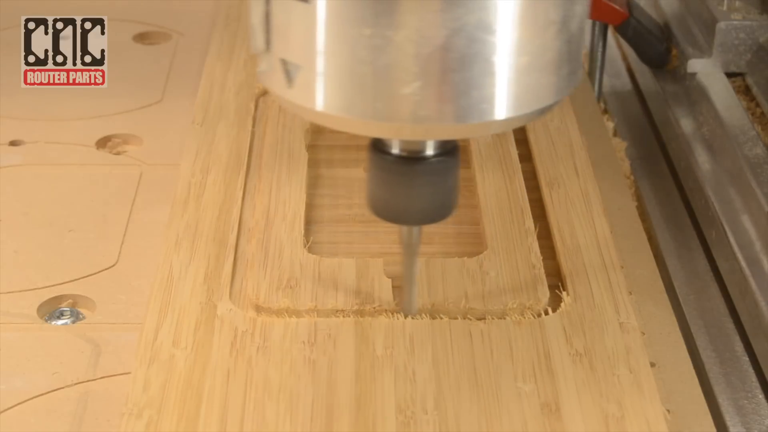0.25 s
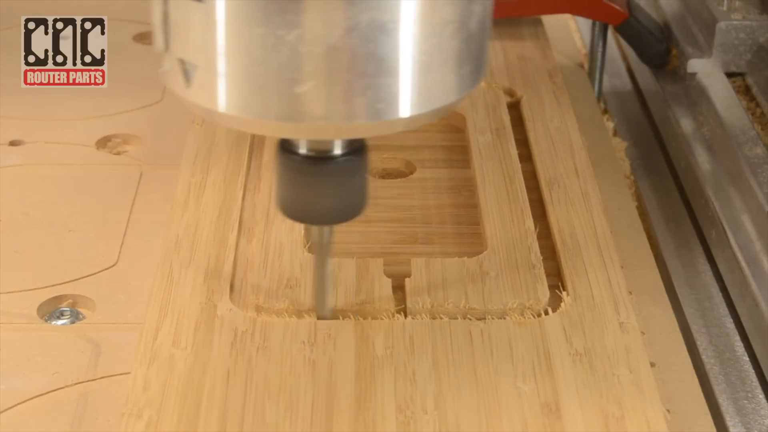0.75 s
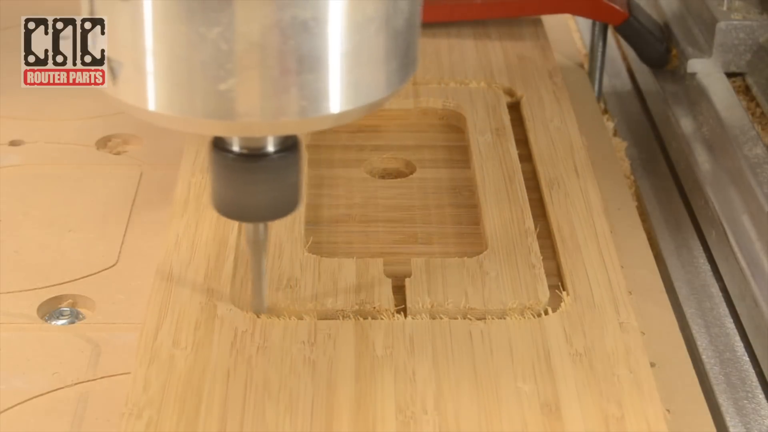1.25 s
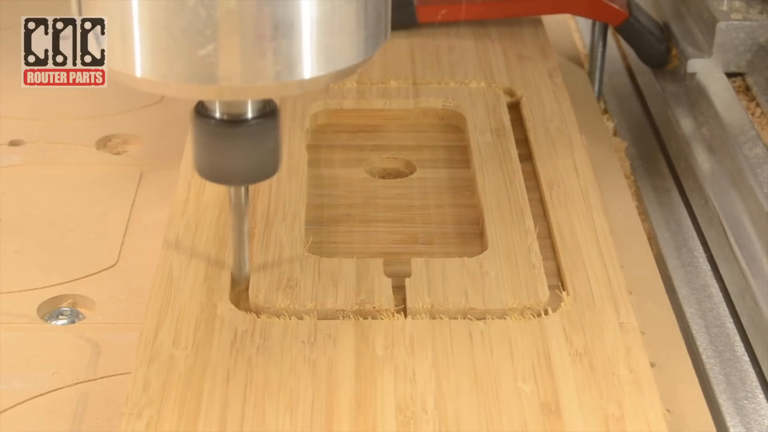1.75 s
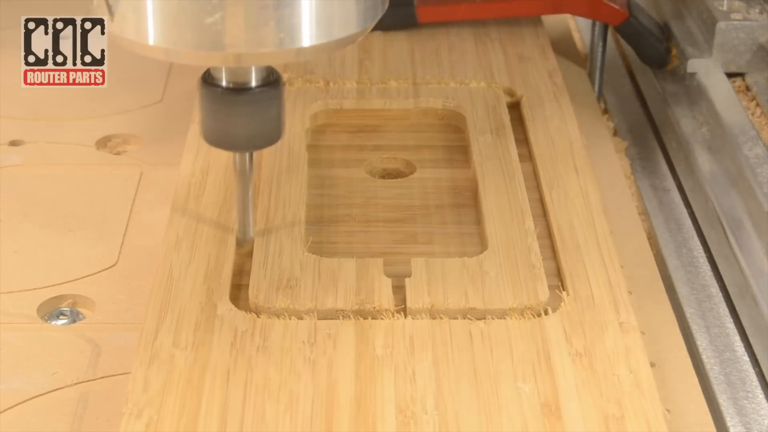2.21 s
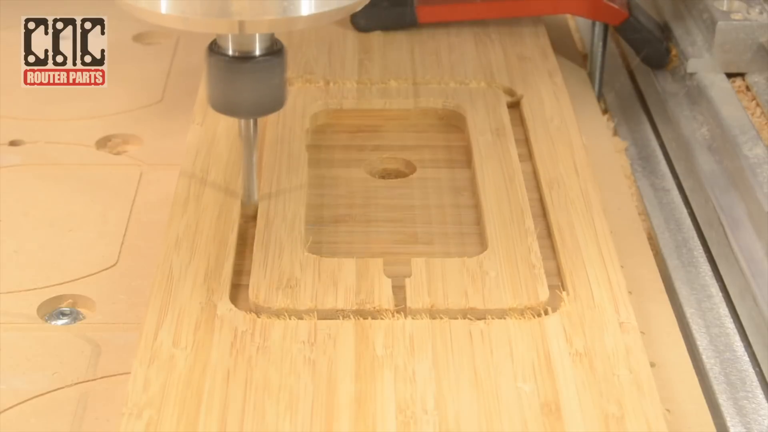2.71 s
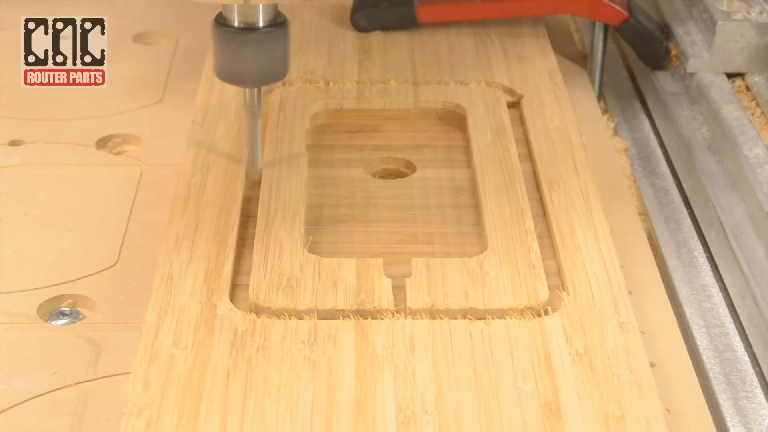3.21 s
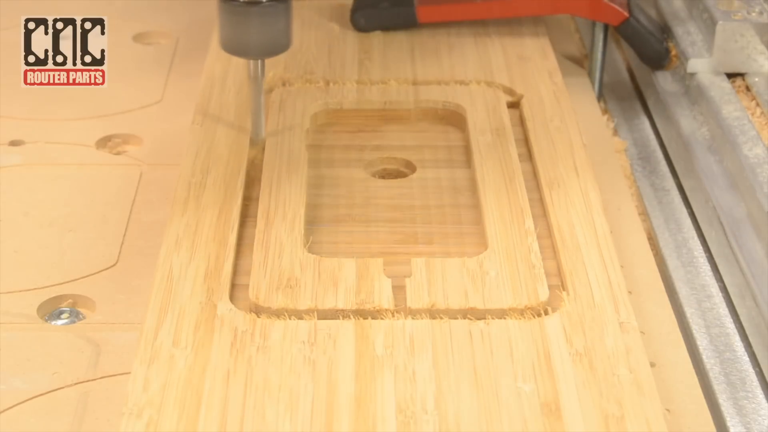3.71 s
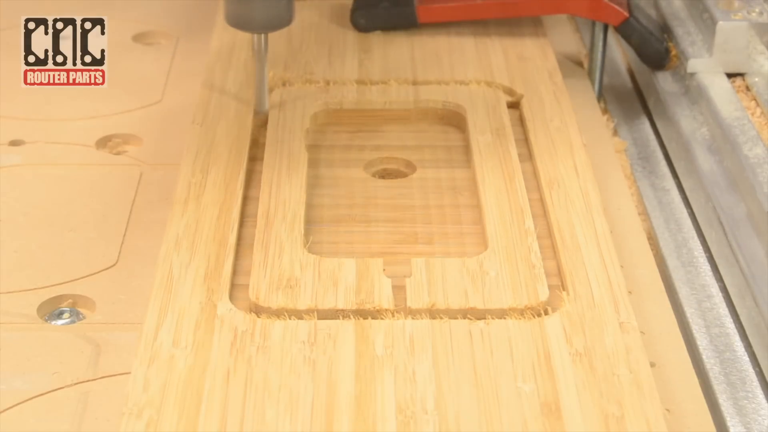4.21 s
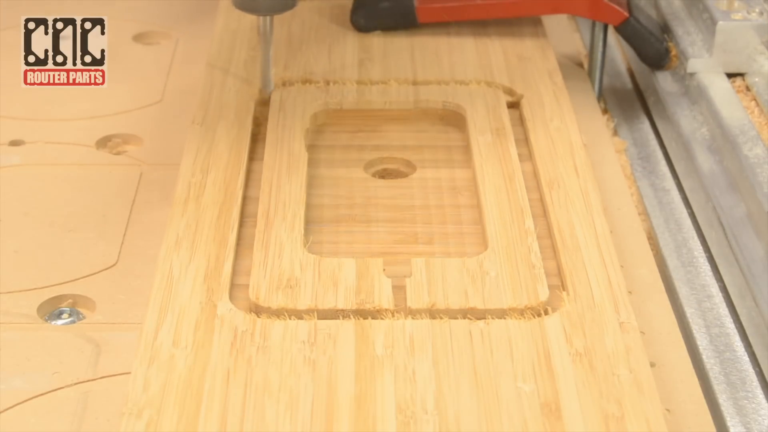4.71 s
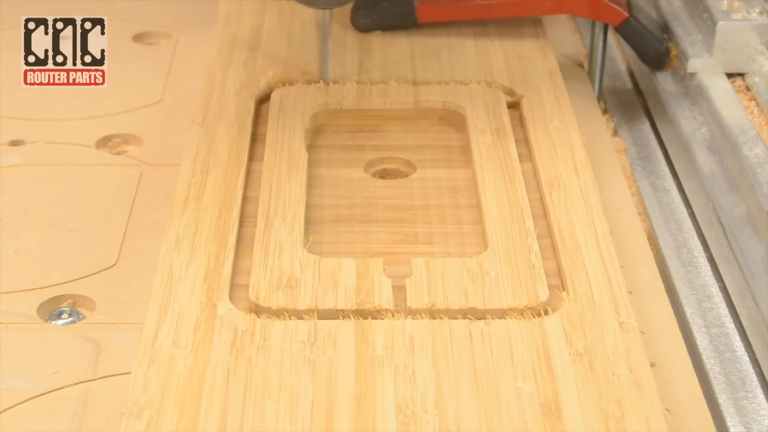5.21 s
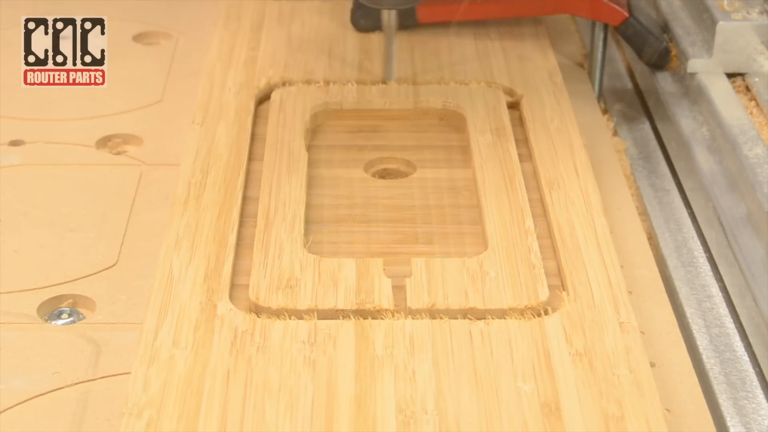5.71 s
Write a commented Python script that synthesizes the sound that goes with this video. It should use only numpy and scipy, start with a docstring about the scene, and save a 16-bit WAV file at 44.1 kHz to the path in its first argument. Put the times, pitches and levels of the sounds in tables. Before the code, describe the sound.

A machine router mills a groove in a wooden board, its spindle giving a steady high whine over an even hiss of air and chips. The cutter squeals in short, shrill, fluttering bursts, loudest and most crowded about a second in. After that the squeals are weaker and more scattered while the whine and hiss carry on. The microphone is close, in a workshop.

```python
"""Bursts of shrill squeal over a steady whine and hiss: a router near 25000 rpm mills a groove in hard board.
The squeal is the long cutter chattering near its bending mode, with sidebands one shaft order apart.
Unbalance, cutting force and a fan sound the shaft orders; a bearing whines between them.
Chips and cooling air hiss, the board drones, machinery hums far off. A small mono microphone stands close."""
import sys
import numpy as np
from scipy import signal
from scipy.fft import rfft, irfft, next_fast_len
from scipy.io import wavfile
from scipy.ndimage import uniform_filter1d, minimum_filter1d, map_coordinates

SR = 44100
rng = np.random.default_rng(int(sys.argv[2]) if len(sys.argv) > 2 else 0)


def master_out(mix):
    """Clip the mix to full scale and print it as 16-bit PCM to the path in sys.argv[1]."""
    frames = np.transpose(np.atleast_2d(mix))
    ceiling = np.clip(frames, -1, 1)
    pcm = np.round(ceiling * 32767).astype(np.int16)
    wavfile.write(sys.argv[1], SR, pcm)


N = 262395

# Chatter bursts. Each row: start of hold in seconds, hold in seconds, decay in dB per second,
# pitch in Hz, then main line, lower sideband and upper sideband in dB.
BURSTS = [(0, 0.11, 100, 2386, -54, -60, -53.5), (0.18, 0.012, 82, 2390, -47.5, -55, -51),
          (.375, 0.046, 72, 2386, -44, -57, -57), (0.483, 0.011, 54, 2380, -41.5, -65, -56),
          (0.702, .035, 100, 2388, -42, -62, -57), (0.754, 0.041, 60, 2377, -36, -57, -50),
          (0.842, 0.047, 150, 2379, -37, -60, -54), (0.91, 0.025, 63, 2377, -37.5, -54, -47),
          (0.975, 0.038, 137, 2386, -35.5, -57, -57), (1.144, 0.052, 60.5, 2386, -39, -62, -53),
          (1.223, 0.11, 350, 2389, -36, -61, -52), (1.38, 0.027, 110, 2390, -42.5, -57, -61),
          (1.57, 0.012, 300, 2405, -52, -54, -50.5), (1.863, 0.023, 95.5, 2410, -47.5, -53, -53),
          (1.98, 0.031, 304, 2400, -50, -59, -59), (2.264, .02, 149, 2420, -47, -64, -55.5),
          (2.52, .03, 100, 2395, -51.5, -56, -56), (2.578, 0.018, 218, 2400, -43.5, -64, -53),
          (2.669, .04, 400, 2410, -40, -52, -48), (2.855, .03, 91, 2408, -47, -57, -59),
          (3.173, .01, 150, 2404, -49.5, -56.5, -59), (3.587, .02, 63, 2375, -54.5, -63, -63),
          (3.74, .03, 113, 2390, -46.5, -53, -56.5), (4.488, .03, 151, 2385, -51, -51, -57),
          (4.525, .04, 399, 2392, -45.5, -48, -70), (4.619, 0.033, 82, 2387, -51, -50, -71),
          (4.699, 0.027, 122, 2397, -52.5, -57, -56), (4.957, .03, 104, 2370, -49, -62, -51),
          (5.03, .02, 300, 2372, -49.5, -60, -51), (5.106, 0.072, 300, 2368, -45.5, -53, -47.5),
          (5.27, 0.064, 150, 2372, -49.5, -58, -50), (5.367, .04, 150, 2370, -49.5, -57.5, -51),
          (5.59, 0.036, 150, 2383, -53, -56, -50)]
# Ringing between bursts. Each row: start in seconds, then main line, lower and upper sideband in dB.
IDLE_RING = [(0, -55, -62, -64), (1.45, -61, -64, -66), (2.3, -59, -70, -64), (3.8, -58, -62, -63),
             (4.75, -62, -64, -62), (5.45, -67, -70, -61.5)]
# Far chatter sidebands. Each row: offset in shaft orders, base level in dB re the first upper sideband.
FAR_SIDEBANDS = [(-3, -18), (-2, -16), (2, -13), (3, -13), (4, -18)]
# The edge leaves the wood at a slot and a corner. Each row: time, climb and settle in seconds,
# pitch rise in Hz, far sideband flare in dB before its cap.
RELEASES = [(1.106, 0.0354, 0.02734, 124.6, 19), (4.58, 0.0561, 0.0584, 94.6, 2)]
# Tool path legs, across and along the grain. Each row: start in seconds, roughness of weak chatter 0-1,
# far sideband gain in dB, then shaft orders 12, 3, 4, 5 and 6 in dB.
PATH_LEGS = [(0, 0.04, 1.5, -65, -59.5, -67, -56.5, -68), (1.38, .25, 2, -67, -62.5, -59, -59.5, -54),
             (2.25, 0.35, 3.5, -70, -57, -57.5, -61, -53), (3.3, 0.27, 5, -69, -59.5, -63.5, -62, -53.5),
             (3.85, 0.21, 1, -68, -55, -60.5, -58.5, -55.5), (4.5, .2, 4, -64, -59.5, -56.5, -59.5, -57),
             (4.93, 0.25, -3.5, -63, -67.5, -66, -63, -55.5), (5.35, 0.23, -2.5, -66, -73, -66, -58, -60.5)]
# Shaft speed, sagging under load. Each row: time in seconds, speed in Hz.
SHAFT_SPEED = [(0.0, 419.05), (0.45, 418.56), (0.97, 416.11), (1.18, 419.13), (1.53, 419.44),
               (1.87, 418.31), (2.43, 417.29), (2.73, 415.98), (2.97, 416.5), (3.46, 416.5), (3.7, 415.52),
               (3.9, 415.69), (4.17, 414.26), (4.33, 414.52), (4.52, 416.15), (4.67, 418.59),
               (5.05, 417.52), (5.95, 416.1)]
# Shaft hum. Each row: time in seconds, orders 1 and 2 in dB.
UNBALANCE = [(0, -58, -59.5), (.45, -56, -63), (.7, -54.5, -62.5), (.97, -51.5, -60.5), (1.1, -60, -67),
             (1.2, -56, -57.5), (1.65, -63, -61), (2.21, -60.5, -62), (2.43, -58.5, -62.5),
             (2.97, -57, -59.5), (3.29, -55, -61), (3.37, -58, -60), (3.65, -54, -62), (3.8, -58.5, -61.5),
             (4.04, -53.5, -62), (4.28, -60, -65.5), (4.52, -60.5, -63), (4.67, -58, -70),
             (4.8, -55.5, -62.5), (5, -58, -59.5), (5.95, -60.5, -58)]
# Cooling fan tone. Each row: time in seconds, level in dB.
FAN_TONE = [(0, -58.5), (.7, -54), (.97, -70), (1.15, -66), (1.65, -58.5), (1.85, -60), (2.25, -67),
            (2.65, -60), (2.82, -69), (2.97, -58), (3.46, -61), (3.65, -67), (4.17, -61), (4.3, -56.5),
            (4.45, -57), (4.61, -63), (5, -56.5), (5.2, -61), (5.95, -54.5)]
# Hard and soft spots in the wood. Each row: time in seconds, half width in seconds, force change in dB.
WOOD_SPOTS = [(.3, .07, 7), (1.28, 0.064, 5), (1.58, .06, 1.5), (1.73, 0.072, -2), (1.86, .07, 1.5),
              (2.01, .06, 0), (2.09, .05, 1), (2.24, 0.054, 1), (2.53, 0.045, 2), (2.72, 0.052, -2),
              (2.91, .06, -3), (3.02, 0.041, 0.5), (3.48, 0.05, -2.5), (3.57, .06, 3.5), (3.78, 0.063, -9),
              (3.87, 0.038, 4.5), (3.93, 0.039, -6), (4.05, 0.031, 8.5), (4.09, .03, -4), (4.55, .08, -4.5)]
# Upper shaft orders. Each row: order, level in dB.
HIGH_ORDERS = [(7, -70), (8, -71), (9, -77), (10, -78), (11, -78), (14, -78), (16, -77), (19, -76)]
# Bearing lines in multiples of shaft speed: ball pass, its three upper sidebands, ball spin.
BEARING_ORDERS = (3.584, 4.584, 5.584, 6.584, 2.705)
# Bearing levels. Each row: start in seconds, then each of those five lines in dB.
BEARING_LEVELS = [(0, -60.5, -71, -72, -76, -68), (.7, -64, -79, -65, -76, -76),
                  (1.38, -64.5, -69, -61, -80, -73), (2.1, -61.5, -61.5, -57.5, -76, -69),
                  (3, -59, -77, -71, -68, -69.5), (3.95, -64, -76, -55.5, -77, -73),
                  (4.5, -62, -74, -72, -77, -85), (5, -68.5, -68, -73, -80, -73)]
# Noise along the path. Each row: time in seconds, then chips, air, collet and board in dB.
NOISE_LEVELS = [(0, -51.5, -50, -57, -79), (.66, -51.5, -50, -57, -70), (.8, -52.5, -49.5, -57, -65.5),
                (1.3, -52, -50, -63, -74), (1.84, -51, -50, -58, -76), (2.1, -50, -49.5, -63, -79),
                (2.55, -51, -50, -61, -70), (3, -50.5, -50.2, -61, -71), (3.3, -50.5, -50.5, -61.5, -70),
                (4.1, -49, -50.5, -72, -61), (4.46, -50.5, -51.5, -68, -67), (4.66, -50, -51, -64, -63),
                (5, -51.5, -51, -65, -67), (5.4, -52, -50.5, -64, -68.5), (5.7, -51.5, -50, -60, -61),
                (5.95, -52, -51, -62, -65)]
# Noise spectra. Each row: frequency in Hz, relative density in dB.
RUMBLE_SPECTRUM = [(60, -6), (130, -3), (250, -2.5), (600, 2), (900, -14)]
DUST_SPECTRUM = [(9000, -28), (11000, -2), (12500, 0), (14000, -6), (15500, -22)]
CHIP_SPECTRUM = [(500, -30.5), (950, -13), (1500, -8), (2100, -2), (2450, -2.5), (2640, -6), (2900, -3.5),
                 (3150, -9.5), (3500, -9), (5000, -12.5), (8000, -40)]
COLLET_SPECTRUM = [(4200, -27.5), (4600, -10.5), (5000, -9.5), (5300, -8), (5600, -32)]
BOARD_SPECTRUM = [(780, -24.5), (870, 5.5), (940, 10), (1010, -26), (1100, -39)]
AIR_SPECTRUM = [(25, -62), (100, -86), (350, -15.5), (500, -14), (760, -8.5), (1000, -10), (2240, -17.5),
                (2430, 0), (2700, -17.5), (4400, -11), (5600, -6), (8150, -5.5), (11000, -16), (15600, -35)]
SHOP_SPECTRUM = [(25, -17), (45, -6), (60, 9), (75, 5), (97, 9.5), (120, -5), (160, -43)]
# Microphone housing dips. Each row: centre in Hz, width in Hz, depth in dB.
HOUSING_NOTCHES = [(5450, 350, 4), (5700, 190, 11), (6895, 90, 12), (15000, 400, 11), (15600, 2400, 5)]


def chatter(shaft_rad, ring_hz, swing_db, lower_db, upper_db):
    """The cutter rings, modulated by each turn. Weak chatter is rough, strong chatter locks."""
    rise_hz, flare_db = edge_release()
    bend_rad = phase_rad(ring_hz + rise_hz + 2.54 * wobble(30.13))
    leg_rough, leg_db, *_ = leg_curves(PATH_LEGS)
    rough = leg_rough / (1 + amp(swing_db + 45.5) ** 2)
    ring = tone(bend_rad, swing_db, rough, skirt_hz=60)
    lower = tone(bend_rad - shaft_rad, lower_db, rough + 0.084, skirt_hz=60)
    upper = tone(bend_rad + shaft_rad, upper_db, rough + 0.024, skirt_hz=60)
    far_db = upper_db + leg_db + np.minimum(flare_db, 12)
    far = sum(tone(bend_rad + k * shaft_rad, far_db + db, rough=0.2, skirt_hz=40)
              for k, db in FAR_SIDEBANDS)
    # A low rumble and a hiss of fine dust swell with the loud squeals.
    rumble = amp(swing_db - 22) * hiss(RUMBLE_SPECTRUM, patchy_db=-0.5)
    dust = amp(swing_db - 35) * hiss(DUST_SPECTRUM, patchy_db=2)
    # A thin overtone at three times the pitch sounds on the loudest squeals.
    third = tone(3 * bend_rad, -59 + 3 * (swing_db + 35.5), rough=0.11, skirt_hz=28.9)
    return ring + lower + upper + far + rumble + dust + third


def cutter_swing():
    """Bursts grow, hold and die. Returns pitch in Hz, then main line, lower and upper sideband in dB."""
    idle_hz, grow_db_per_s = 2392, 302.5
    gap_depth_db, gap_half_s = 10, 0.02
    t = np.arange(N) / SR
    power = amp([db + 3 * wobble(9) for db in leg_curves(IDLE_RING)]) ** 2
    weighted_hz = idle_hz * power[0]
    for start_s, hold_s, decay_db_per_s, hz, *lines_db in BURSTS:
        ramp_db = np.minimum(grow_db_per_s * (t - start_s), decay_db_per_s * (start_s + hold_s - t))
        burst_power = np.outer(amp(lines_db) ** 2, amp(np.minimum(0, ramp_db)) ** 2)
        power += burst_power
        weighted_hz += hz * burst_power[0]
    # The ring breaks off at each release.
    gap_db = sum(gap_depth_db * np.exp(-((t - at_s) / gap_half_s) ** 4) for at_s, *_ in RELEASES)
    levels_db = 10 * np.log10(power) - gap_db + 1.07 * wobble(22)
    return (weighted_hz / power[0], *levels_db)


def edge_release():
    """Pitch rise in Hz and sideband flare in dB climb as the edge comes free, then settle."""
    t = np.arange(N) / SR
    return sum(np.outer(peaks, np.exp(np.minimum((t - at_s) / climb_s, (at_s - t) / settle_s)))
               for at_s, climb_s, settle_s, *peaks in RELEASES)


def spindle(shaft_rad, swing_db):
    """Unbalance and fan are nearly pure; wood grain makes the force orders rough and fluttery."""
    fan_blades, grain_db = 18, 1.5
    _, _, whine_db, *force_db = leg_curves(PATH_LEGS)
    first_db, second_db = curves(UNBALANCE)
    hum = tone(shaft_rad, first_db, rough=0.02, skirt_hz=40)
    hum += tone(2 * shaft_rad, second_db, rough=0.04, skirt_hz=40)
    fan = tone(fan_blades * shaft_rad, curves(FAN_TONE)[0], rough=0.1, skirt_hz=30)
    whine = tone(12 * shaft_rad, whine_db, rough=0.08, skirt_hz=30)
    chatter_loss_db = 7 / (1 + amp(-41 - swing_db) ** 2)  # strong chatter saps the force orders
    load_db = wood_spots_db() - chatter_loss_db
    force = sum(tone(k * shaft_rad, db + load_db + grain_db * wobble(11), rough=0.14, skirt_hz=70)
                for k, db in enumerate(force_db, 3))
    high = sum(tone(k * shaft_rad, db + 3 * wobble(4.5), rough=0.13, skirt_hz=33)
               for k, db in HIGH_ORDERS)
    return hum + fan + whine + force + high


def wood_spots_db():
    """Cutting force jumps at hard spots and drops at soft ones, a triangle in time each."""
    t = np.arange(N) / SR
    return sum(db * np.maximum(0, 1 - abs(t - at_s) / half_s) for at_s, half_s, db in WOOD_SPOTS)


def bearing(shaft_rad):
    """Balls passing a race give steady lines between the shaft orders."""
    return sum(tone(k * shaft_rad, db + 0.99 * wobble(2.93), rough=0.013, skirt_hz=18)
               for k, db in zip(BEARING_ORDERS, leg_curves(BEARING_LEVELS)))


def chips_and_air(shaft_rad, swing_db):
    """Chips tear off once a turn and rattle the board; the collet hisses; cooling air roars evenly."""
    chips_db, air_db, collet_db, board_db = curves(NOISE_LEVELS)
    turn_pulse = unit_rms(1 + 0.25 * np.cos(shaft_rad))
    flow = np.hypot(amp(chips_db), amp(swing_db - 16))  # part rides on the chatter
    chips = flow * amp(0.91 * wobble(25)) * turn_pulse * hiss(CHIP_SPECTRUM, patchy_db=0.87)
    collet = amp(collet_db) * turn_pulse * hiss(COLLET_SPECTRUM, patchy_db=1.5)
    board = amp(board_db) * hiss(BOARD_SPECTRUM, patchy_db=2)
    air = amp(air_db) * hiss(AIR_SPECTRUM, patchy_db=0.63)
    return chips + collet + board + air


def shop():
    """Distant machinery drones."""
    return amp(-82) * hiss(SHOP_SPECTRUM, patchy_db=0.1)


def amp(db):
    return 10 ** (np.asarray(db) / 20)


def unit_rms(x):
    return x / np.sqrt(np.mean(x ** 2) + 1e-20)


def phase_rad(hz):
    return 2 * np.pi * np.cumsum(hz) / SR


def curves(rows):
    """One value per sample for each column after the time."""
    times_s, *columns = np.transpose(rows)
    return [np.interp(np.arange(N) / SR, times_s, column) for column in columns]


def leg_curves(rows, glide_s=0.16):
    """Each column holds along a leg, then glides to the next."""
    ends_s = [row[0] for row in rows[1:]] + [N / SR + glide_s]
    return curves([(at_s, *values) for (start_s, *values), end_s in zip(rows, ends_s)
                   for at_s in (start_s + glide_s / 2, end_s - glide_s / 2)])


def wobble(knots_per_s):
    """Smooth random curve."""
    coarse = np.arange(0, N + 32, 32)
    knots = rng.standard_normal(int(N * knots_per_s / SR) + 6)
    return np.interp(np.arange(N), coarse, map_coordinates(knots, [coarse * knots_per_s / SR]))


def filtered(x, gain_at_hz):
    """Zero-phase FFT filter."""
    size = next_fast_len(N + 8192)
    return irfft(rfft(x, size) * gain_at_hz(np.fft.rfftfreq(size, 1 / SR)), size)[..., :N]


def tone(rad, rms_db, rough, skirt_hz):
    """A line with the share `rough` of its power scattered into a noisy skirt."""
    rough = np.clip(rough, 0, 1)
    skirt = (wobble(skirt_hz) + 1j * wobble(skirt_hz)) / np.sqrt(2)
    envelope = np.sqrt(1 - rough) * np.exp(2j * np.pi * rng.random()) + np.sqrt(rough) * skirt
    return np.sqrt(2) * amp(rms_db) * np.real(envelope * np.exp(1j * rad))


def hiss(spectrum, patchy_db):
    """Shaped noise of rms 1 with random gain patches in time and frequency."""
    bins = signal.stft(rng.standard_normal(N), nperseg=512)[2]
    patches = uniform_filter1d(rng.standard_normal(bins.shape), size=6, axis=0)
    patches = unit_rms(uniform_filter1d(patches, size=12, axis=1))
    noise = signal.istft(bins * amp(patchy_db * patches), nperseg=512)[1][:N]
    points_hz, points_db = np.transpose(spectrum)
    shaped = filtered(noise, lambda hz: amp(np.interp(np.log1p(hz), np.log1p(points_hz), points_db)))
    return unit_rms(shaped)


def scene():
    """One shaft phase and one cutter swing drive the router; both channels are equal."""
    shaft_rad = phase_rad(curves(SHAFT_SPEED)[0])
    ring_hz, swing_db, lower_db, upper_db = cutter_swing()
    whine = spindle(shaft_rad, swing_db) + bearing(shaft_rad)
    squeal = chatter(shaft_rad, ring_hz, swing_db, lower_db, upper_db)
    mono = squeal + whine + chips_and_air(shaft_rad, swing_db) + shop()
    return np.array([mono, mono])


def record(dry):
    """Housing notches and bass cut, a fast limiter on the loudest squeals, then the band limit."""
    bass_cut_hz, top_hz, ceiling = 130, 15703, 0.029

    def microphone_gain(hz):
        dip_db = sum(depth_db / (1 + (2 * (hz - centre_hz) / width_hz) ** 2)
                     for centre_hz, width_hz, depth_db in HOUSING_NOTCHES)
        return amp(-dip_db) * hz ** 2 / (hz ** 2 + bass_cut_hz ** 2)

    x = filtered(dry, microphone_gain)
    needed_gain = np.minimum(1, ceiling / (np.abs(x) + 1e-9))
    gain = uniform_filter1d(minimum_filter1d(needed_gain, size=200), size=200)
    return filtered(x * gain, lambda hz: hz < top_hz)


dry = scene()
out = record(dry)
master_out(out)
```